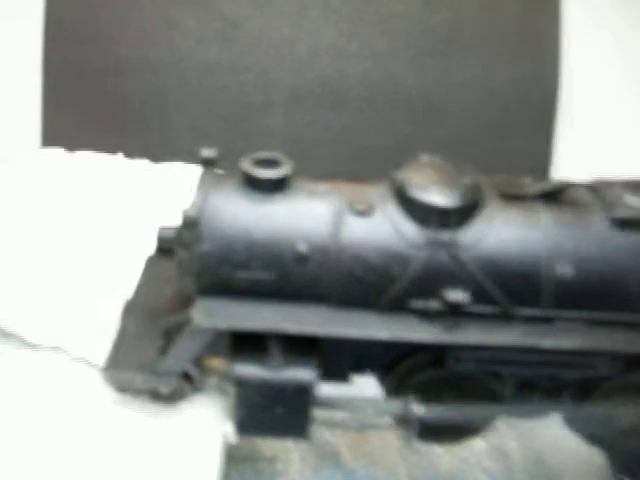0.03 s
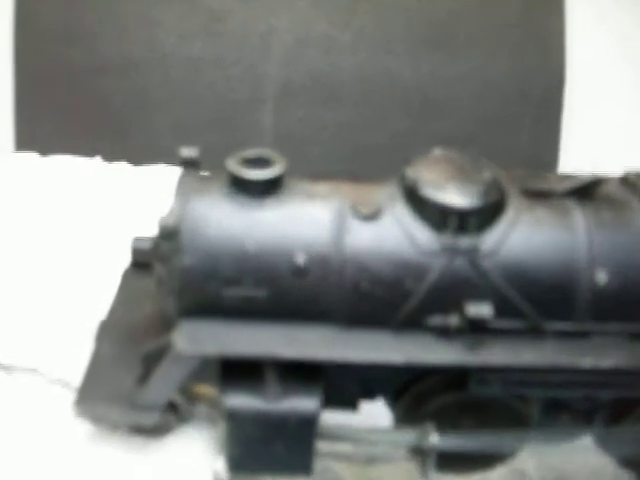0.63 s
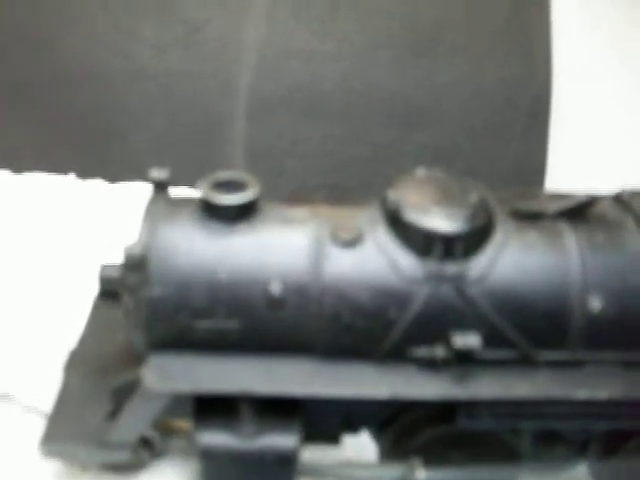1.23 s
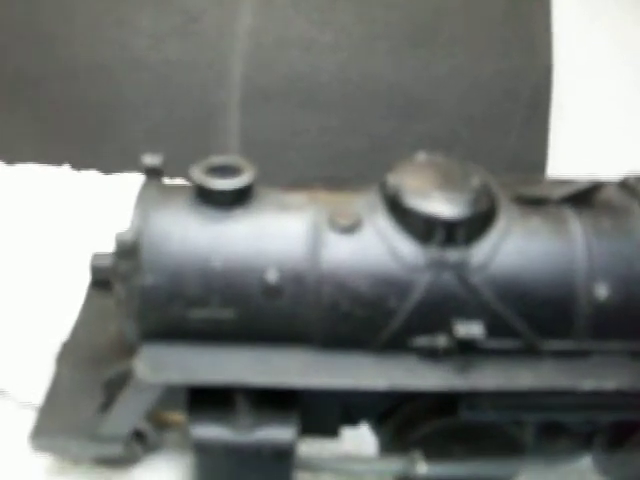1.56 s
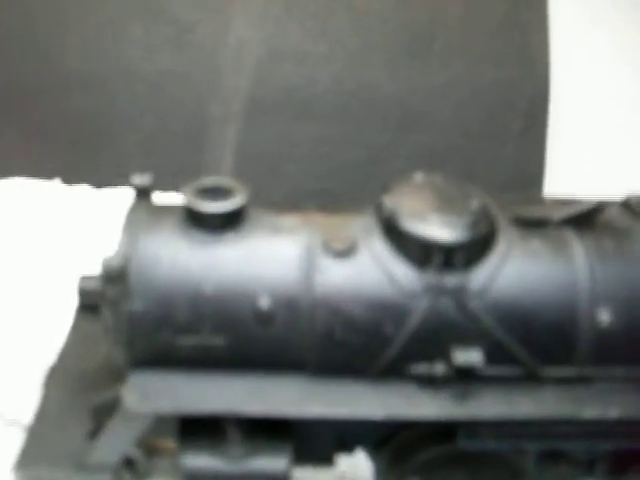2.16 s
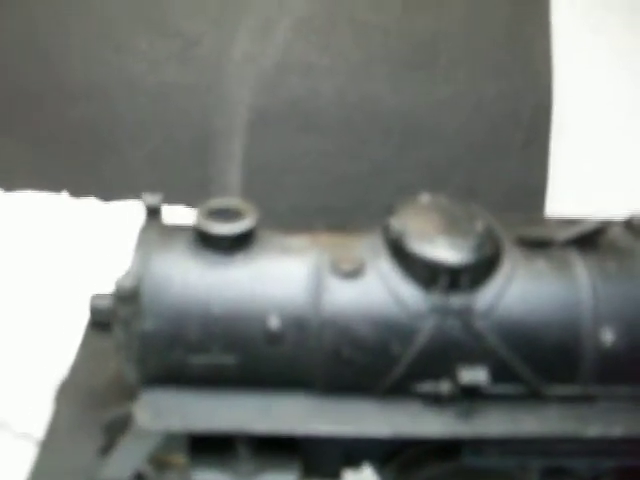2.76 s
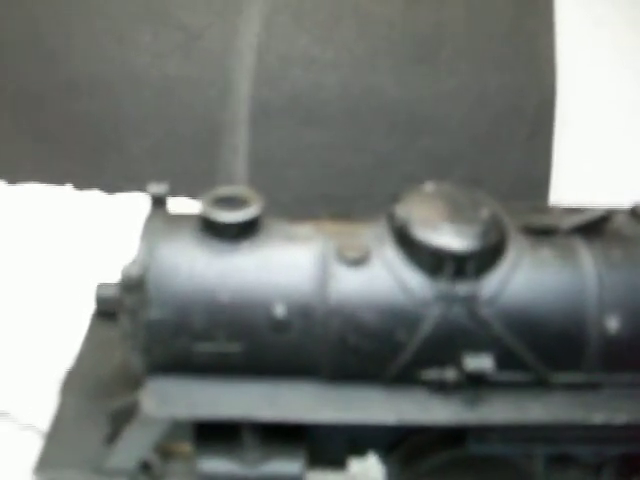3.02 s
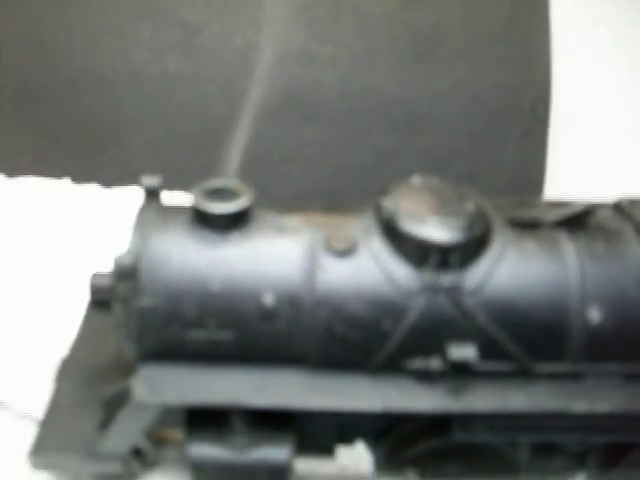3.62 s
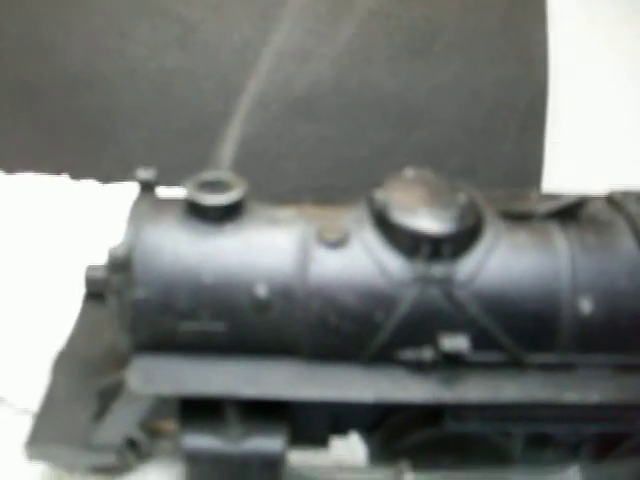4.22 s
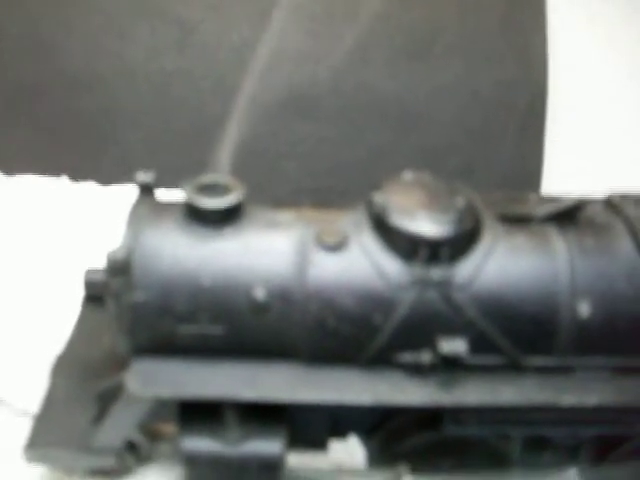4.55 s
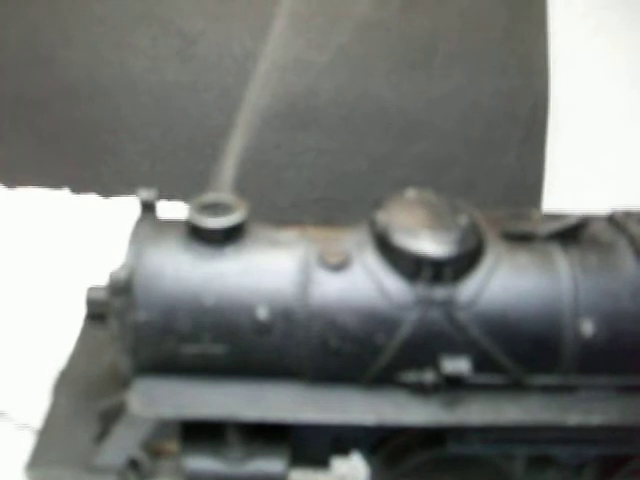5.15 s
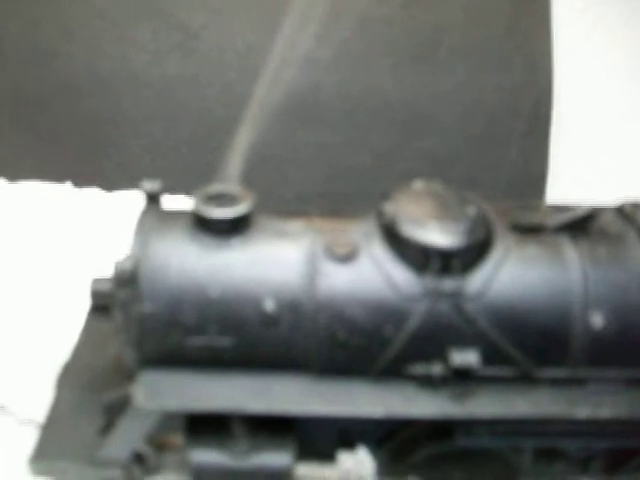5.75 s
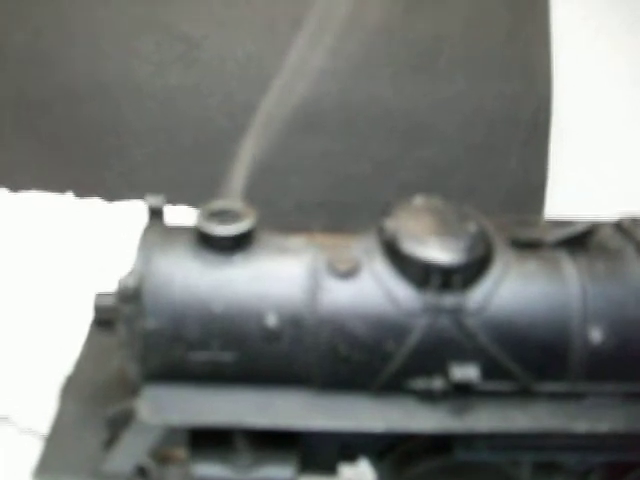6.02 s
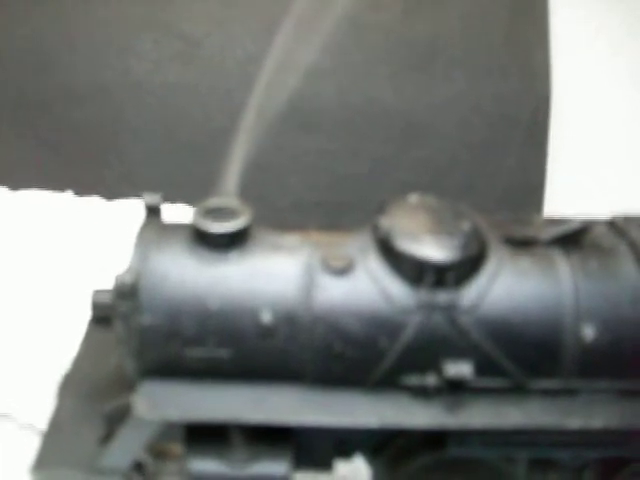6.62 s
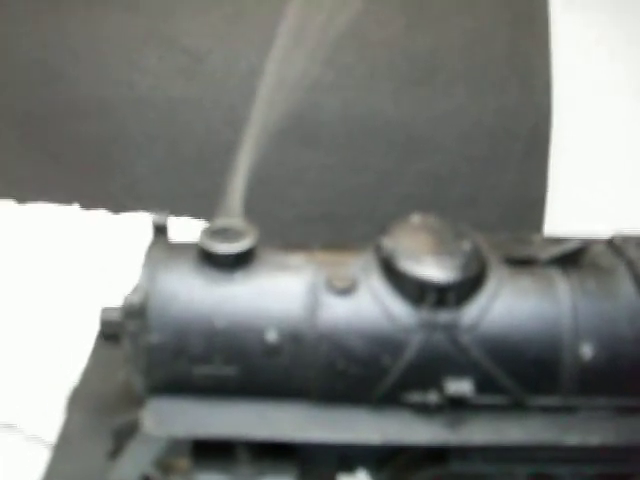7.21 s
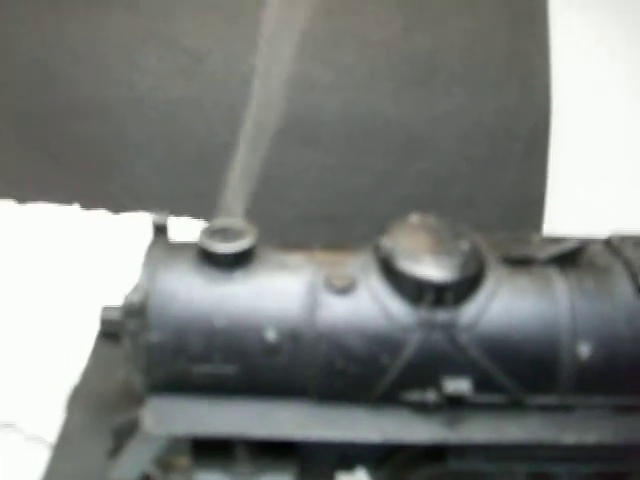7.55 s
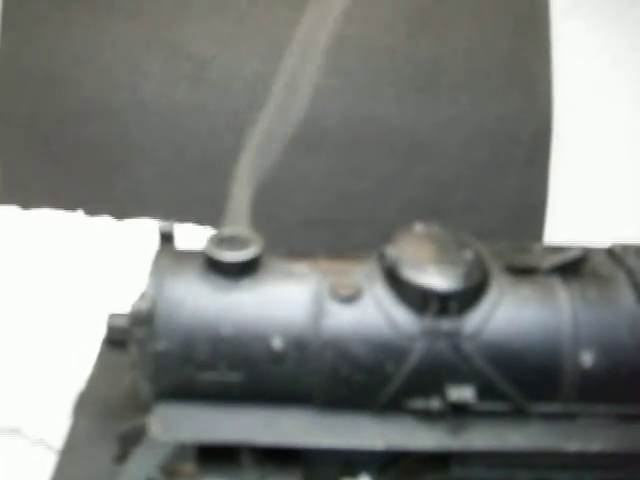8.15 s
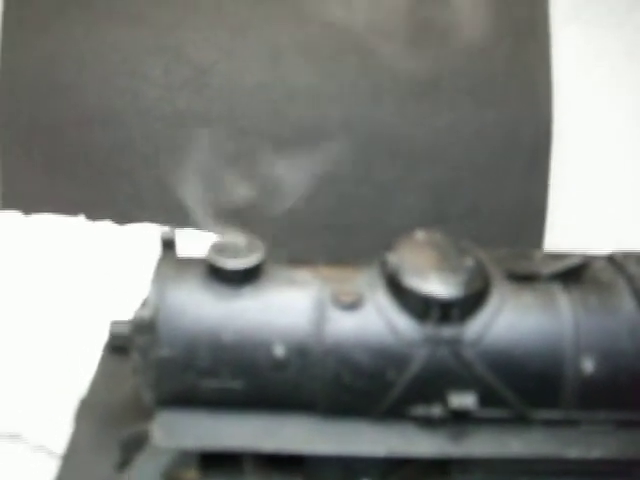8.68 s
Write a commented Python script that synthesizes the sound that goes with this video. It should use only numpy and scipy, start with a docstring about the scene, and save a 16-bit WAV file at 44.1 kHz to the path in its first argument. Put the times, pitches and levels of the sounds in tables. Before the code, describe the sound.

A toy steam locomotive runs on the spot for about nine seconds, close to a small mono microphone. From the first moment its loose gears chatter in a fast, even, buzzing rattle that rings the metal shell, tinny but with little high treble. Underneath, the small electric motor gives a quieter whir that throbs, the throb slowing as the motor gains a little speed.

In four spells the gears knock harder and overload the microphone, making thin bright ticks and dull pops: from the start to about 1.7 seconds, from 2.6 to 5, around 6 to 6.4, and from 7.3 to 8.6. Between the spells the rattle continues with only a few clicks. The two loudest pops land near 6 and 8.3 seconds. The toy runs on at the same level to the end.

```python
"""A toy steam locomotive runs on the spot, close to a small mono microphone.
From the start its mains-fed motor pulls in pulses, so the loose gears chatter at twice the mains
frequency and ring the metal shell. The rotor's whir throbs against the pulses, more slowly as it
gains speed. In four spells the gears slam harder and overload the recorder, which clips with bright
ticks or dull pops. The two loudest pops come late, near 6 s and 8.3 s, and the toy runs on."""
import sys
import numpy as np
from scipy import signal
from scipy.fft import rfft, irfft, next_fast_len
from scipy.io import wavfile
from scipy.ndimage import minimum_filter1d, map_coordinates

SR = 44100
rng = np.random.default_rng(int(sys.argv[2]) if len(sys.argv) > 2 else 0)


def master(y):
    """Save y as 16-bit WAV."""
    cut = np.clip(np.atleast_2d(y).T, -1, 1)
    pcm = np.round(cut * 32767)  # scale
    wavfile.write(sys.argv[1], SR, pcm.astype(np.int16))


N = 386316
TIME = np.arange(N) / SR
PULSE_HZ, PULSE_START_CYCLES = 120.0425, .14  # the motor pulls twice per mains cycle
SLAM_RISE_S = 0.001  # from a slam's first contact to its peak


def gears(hard_times, scatter_s=.0006, spread_db=3.5, rattles_per_s=450, swell_s=0.00087, fade_s=0.011):
    """Gear teeth slam at each motor pulse and rattle in between; every contact rings the shell."""
    pulses = pulse_times()
    offset, force = rng.uniform(-1.1, 1, (len(pulses), 2)).T
    # a hard slam takes up the slack, so the next ones are softer
    force = unit(signal.lfilter([1, -1, -.5], 1, force))
    slam_times = pulses - SLAM_RISE_S - swell_s / 2 + scatter_s * unit(offset)
    # gains are squared into energies, which add up when contacts overlap
    slams = impulses(slam_times, amp(spread_db * np.minimum(force, 1.5)) ** 2)
    rattle = (rng.random(N) < rattles_per_s / SR) * amp(-6 + 4 * rng.random(N)) ** 2
    hard = impulses(hard_times, None) * amp(4) ** 2
    scrape = amp(-10.5) ** 2
    # each contact swells, then fades by 60 dB in fade_s
    t = TIME[:SR // 20]
    burst = np.minimum(t / swell_s, amp(-60 * (t - swell_s) / fade_s)) ** 2
    energy = np.abs(signal.fftconvolve(slams + rattle + hard, burst)[:N])
    # each pull presses all contacts harder, the sliding ones too
    loudness = np.sqrt((energy + scrape) * motor_pull(depth=0.2))
    return unit(filtered(loudness * rng.standard_normal(N), tone))


def motor_pull(depth):
    """The motor's turning force swells on each half wave of the mains."""
    return 1 + depth * np.cos(2 * np.pi * (PULSE_HZ * TIME + PULSE_START_CYCLES))


def pulse_times():
    """The moments, in seconds, when the motor pulls hardest."""
    return (np.arange(int(N / SR * PULSE_HZ)) + 1 - PULSE_START_CYCLES) / PULSE_HZ


# The rattle's overall tone: the metal body's colour, with the recorder's treble cut near 6 kHz.
# Columns: pitch_hz, level_db
OVERALL_TONE = [(25, -27), (300, -26), (600, -18.5), (1200, -15.5), (1650, -16.5), (2400, -9), (2680, -2.5),
                (3500, -3), (3900, -6), (4800, -8), (5250, -9.5), (5650, -18), (6000, -30), (6450, -59)]
# The pitches at which shell and frame ring. Columns: pitch_hz, width_hz, boost_db
SHELL_RINGS = [(428.5, 46, 9.5), (680, 56, 4.5), (788, 29, -0.5), (1033, 25, 2), (1385, 190, 9.5),
               (1727, 41, 3), (2630, 110, 1), (3350, 100, 1), (3526, 370, 2.5), (4110, 210, 2.5),
               (4720, 310, 2.7)]


def tone(hz):
    """The gain at each pitch: the metal body colours and rings, and the recorder cuts the treble."""
    pitch_hz, level_db = np.transpose(OVERALL_TONE)
    tone_db = np.interp(np.log(hz + 1), np.log(pitch_hz), level_db)
    recorder_cut_db = 30 * np.clip((hz - pitch_hz[-1]) / 500, 0, 1)
    rings_db = sum(boost / (1 + (2 * (hz - pitch) / width) ** 2) for pitch, width, boost in SHELL_RINGS)
    return amp(tone_db - recorder_cut_db + rings_db)


# The main pops of the overloaded recorder. Columns: peak_s, level_db (before boost_db)
MAIN_POPS = [(0.474, -15.5), (0.8394, -13), (1.2397, -19), (1.3561, -22), (2.1396, -19.5), (2.6477, -21),
             (3.055, -19.5), (3.3053, -11.5), (3.398, -18.5), (3.6399, -10), (4.1143, -22), (4.313, -20),
             (4.3629, -14), (4.5059, -22.5), (4.6551, -23.5), (5.9805, -5), (6.2303, -18), (6.9218, -14),
             (7.2457, -21), (7.3641, -20), (7.6206, -19), (8.2958, -5)]


def pops(slams, boost_db=13, thump_s=0.00016, crack_db=-2, crack_s=0.00017, crack_hz=1800):
    """Dull pops as the recorder overloads on loud peaks: a one-sided thump with a brief crack."""
    peak_s, level_db = slams.T
    t = np.arange(-128, 129) / SR
    thump = -np.exp(-.5 * (t / thump_s) ** 2)
    crack = amp(crack_db) * np.exp(-.5 * (t / crack_s) ** 2) * np.sin(2 * np.pi * crack_hz * t)
    return signal.fftconvolve(impulses(peak_s, amp(level_db + boost_db)), thump + crack, "same")


# The main ticks of clipping on loud slams. Columns: start_s, level_db (before boost_db)
MAIN_TICKS = [(0.0556, -26), (0.388, -32.5), (0.7557, -27), (1.4463, -31), (2.8537, -22), (3.3703, -25),
              (3.6368, -28), (3.747, -22.5), (3.894, -27.5), (4.311, -30), (4.3605, -22.5), (4.9373, -29),
              (6.2277, -23), (7.7125, -28), (8.0034, -28.5), (8.1863, -33), (8.2935, -32), (8.6192, -25.5)]


def ticks(slams, boost_db=14, soften_above_hz=9000):
    """Thin, bright clicks of clipping distortion, as the recorder cuts the tops off the loudest strikes."""
    start_s, level_db = slams.T
    clicks = impulses(start_s + SLAM_RISE_S, amp(level_db + boost_db))
    return filtered(clicks, lambda hz: 1 / np.sqrt(1 + (hz / soften_above_hz) ** 2))


# Spells when the gears run loose and slam hard more often. Columns: start_s, end_s
LOOSE_SPELLS = [(0, 1.75), (2.6, 5.05), (5.95, 6.4), (7.3, 8.65)]


def hard_slams(main, extra_per_s, range_db, calm_share=0.14):
    """Rows of time_s, level_db: the main slams plus weaker chance ones, mostly in the loose spells."""
    pulses = pulse_times()
    chance, weakness = rng.random((len(pulses), 2)).T
    loose = np.any([(start < pulses) & (pulses < end) for start, end in LOOSE_SPELLS], axis=0)
    happens = chance < extra_per_s / PULSE_HZ * np.where(loose, 1, calm_share)
    top_db = np.quantile(main[:, 1], 1 / 4)
    weaker = np.column_stack([pulses - SLAM_RISE_S, top_db - range_db * weakness])
    return np.vstack([main, weaker[happens]])


# The speed of the rotor, the motor's spinning part, creeping up. Columns: time_s, turns_per_s
ROTOR_SPEED = [(0, 108.9), (1.6, 110.4), (1.9, 110.8), (2.7, 111.3), (3.0, 112.0), (3.6, 111.5),
               (4.5, 111.0), (4.9, 113.2), (5.8, 114.9), (6.4, 112.9), (6.8, 114.1), (7.8, 112.9),
               (8.7, 113.3)]
# The tones that make up its knock. Columns: multiple_of_speed, level_db (before filtering)
KNOCK_TONES = [(2, -1), (3, -9.5), (4, 2), (5, -16.5), (6, -9.5), (7, -0.5), (8, -2.5), (9, 0.5), (10, 3.5),
               (11, -1), (12, -4.5), (13, -3), (15, -5), (16, 1)]


def rotor(flutter=.003, rough_db=2.46, throb_db=4.5, surge_turns=.022, hum_db=-23):
    """The rotor knocks once a turn, harder when in step with the pulses; its pitch wavers each throb."""
    turns = np.cumsum(curve(ROTOR_SPEED) * (1 + flutter * wobble(22))) / SR
    in_step = np.cos(2 * np.pi * (PULSE_HZ * TIME - turns))
    angle = 2 * np.pi * (turns - surge_turns * in_step)
    knocks = sum(amp(db + rough_db * wobble(45)) * np.cos(multiple * angle)
                 for multiple, db in KNOCK_TONES)
    whir = unit(filtered(knocks * amp(throb_db * in_step), tone))
    hum = amp(hum_db) * unit(np.sin(angle))  # the rotor is a little off balance
    return whir + hum


def amp(db):
    """Turn decibels into a gain to multiply by."""
    return 10 ** (np.asarray(db) / 20)


def unit(x):
    """Scale to an average (rms) level of 1."""
    return x / np.sqrt(np.mean(x ** 2) + 1e-20)


def curve(rows):
    """Join rows of time_s, value with straight lines."""
    return np.interp(TIME, *np.transpose(rows))


def wobble(points_per_s):
    """A smooth curve through random points."""
    points = rng.standard_normal(int(N * points_per_s / SR) + 4)
    return unit(map_coordinates(points, [TIME * points_per_s]))


def impulses(times, sizes):
    """One spike at each time; sizes=None makes each 1 high."""
    return np.bincount(np.clip(np.round(times * SR).astype(int), 0, N - 1), sizes, N)


def filtered(x, gain):
    """Make each pitch in x louder or softer by gain(hz)."""
    size = 2 * next_fast_len(N // 2 + SR // 4)
    hz = np.fft.rfftfreq(size, 1 / SR)
    cepstrum = irfft(np.log(np.maximum(gain(hz), 1e-6)))
    # fold it so that ringing comes after a hit, never before
    cepstrum[1:size // 2] *= 2
    cepstrum[size // 2 + 1:] = 0
    return irfft(rfft(x, size) * np.exp(rfft(cepstrum)), size)[:N]


def scene(chatter_db=-16.5, whir_db=-33):
    """Gears and rotor run steadily under the ticks and pops; both channels are alike."""
    bright = hard_slams(np.array(MAIN_TICKS), extra_per_s=11, range_db=14)
    dull = hard_slams(np.array(MAIN_POPS), extra_per_s=1, range_db=8)
    hard_times = np.concatenate([bright[:, 0], dull[:, 0] - SLAM_RISE_S])
    running = amp(chatter_db) * gears(hard_times) + amp(whir_db) * rotor()
    return np.tile(running + ticks(bright) + pops(dull), (2, 1))


def record(dry, ceiling=0.81, top_hz=15830):
    """A fast limiter turns the loudest peaks down, and everything above top_hz is cut."""
    needed_gain = np.minimum(1, ceiling / (np.abs(dry).max(axis=0) + 1e-9))
    held_gain = minimum_filter1d(needed_gain, size=81)
    window = np.hanning(81)
    smooth_gain = 1 + signal.fftconvolve(held_gain - 1, window / window.sum(), "same")
    return irfft(rfft(dry * smooth_gain) * (np.fft.rfftfreq(N, 1 / SR) < top_hz), N)


dry = scene()
out = record(dry)
master(out)
```